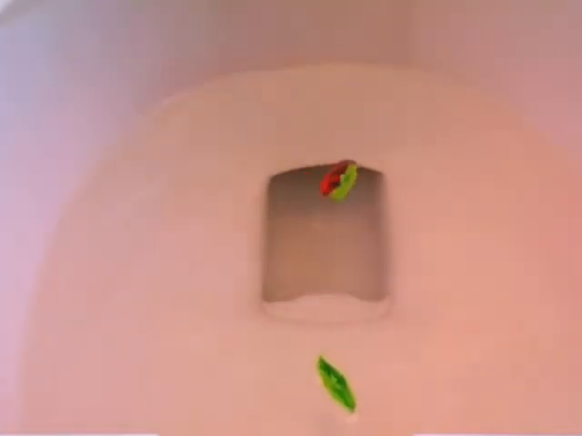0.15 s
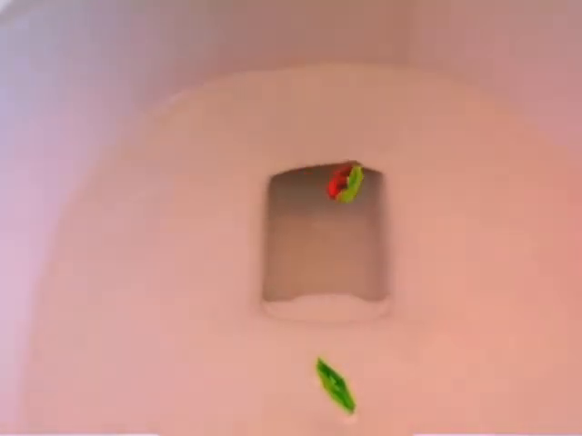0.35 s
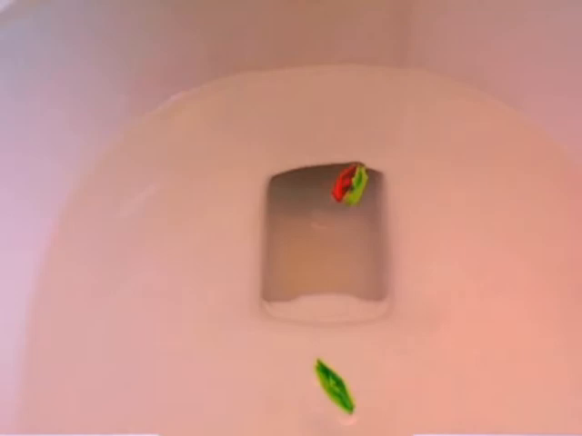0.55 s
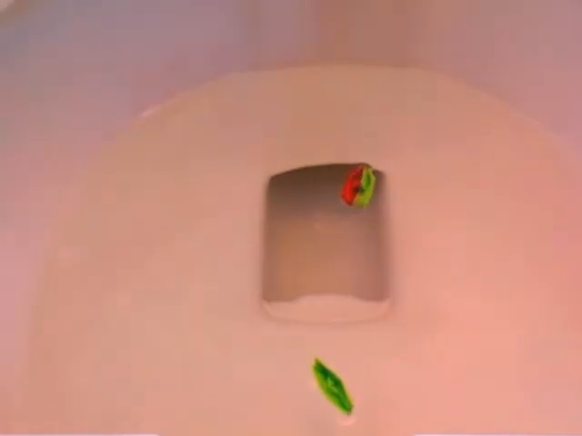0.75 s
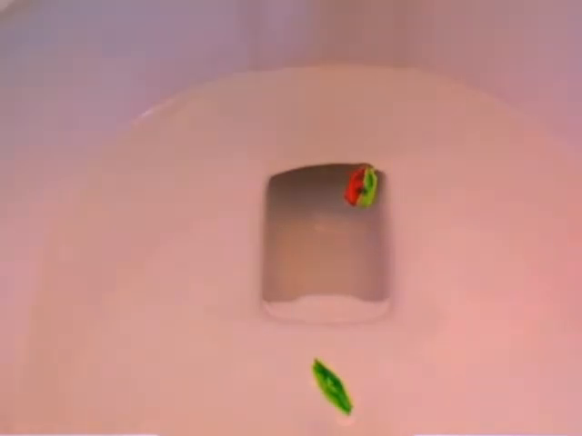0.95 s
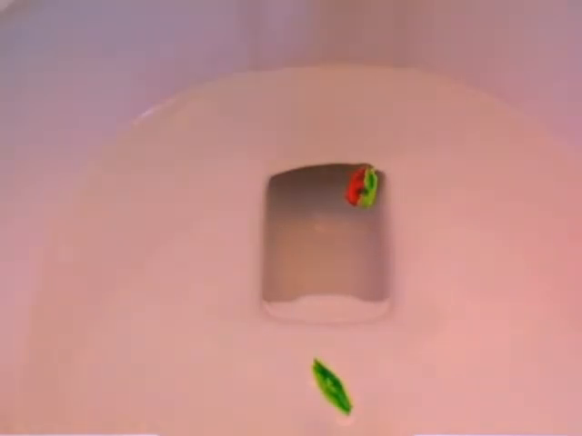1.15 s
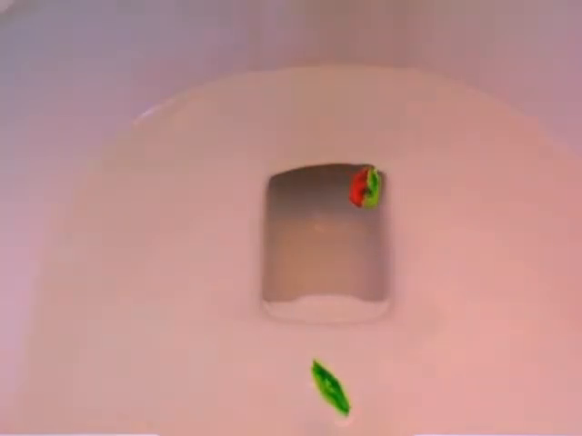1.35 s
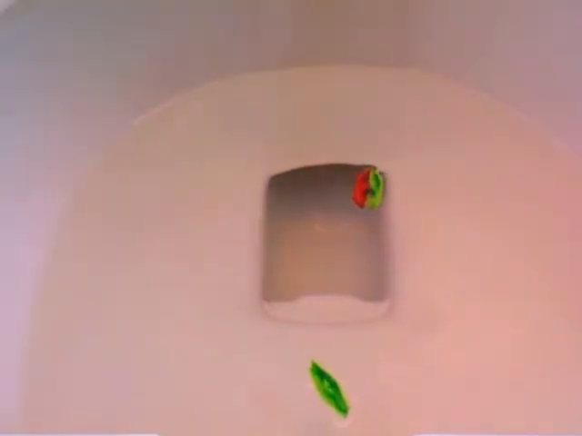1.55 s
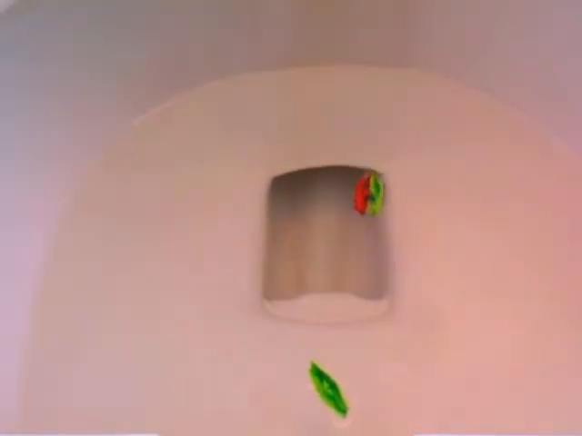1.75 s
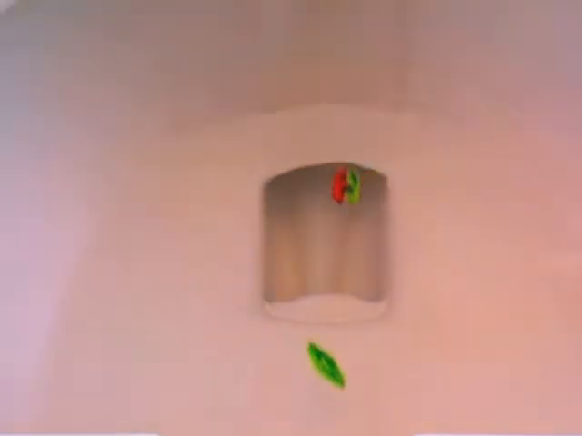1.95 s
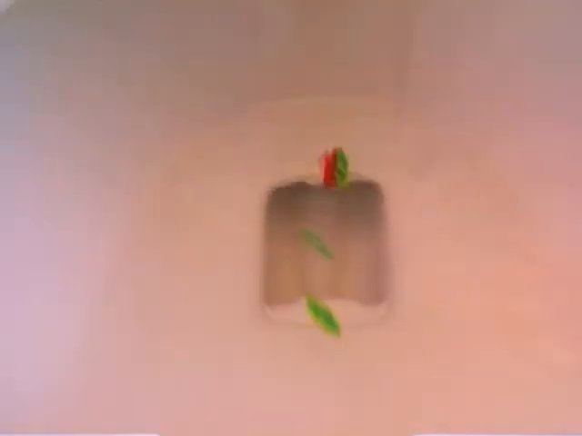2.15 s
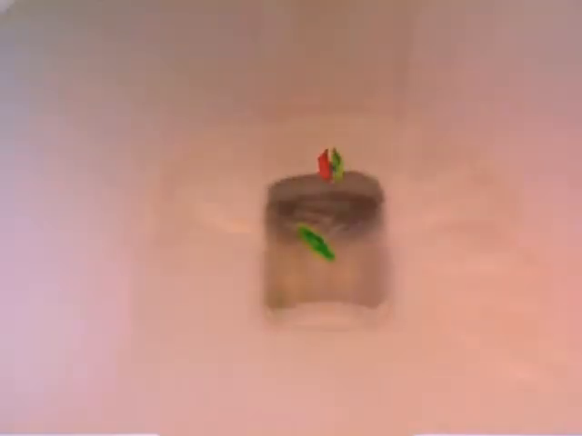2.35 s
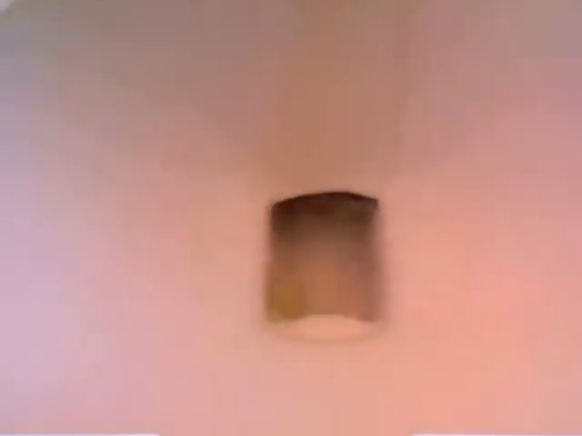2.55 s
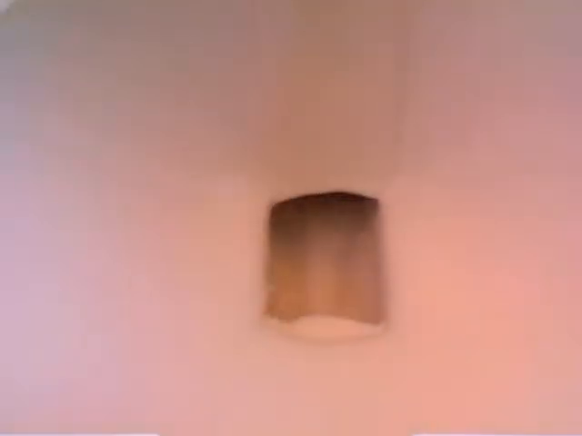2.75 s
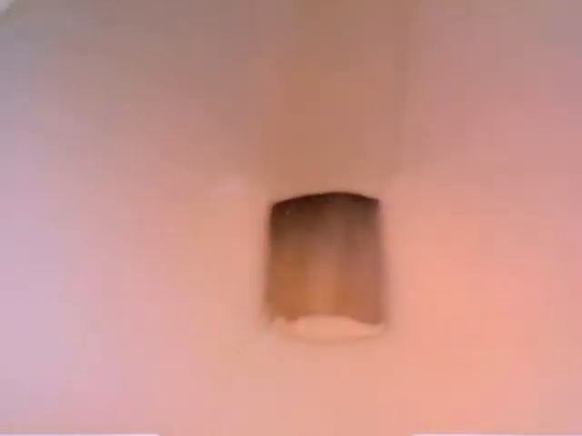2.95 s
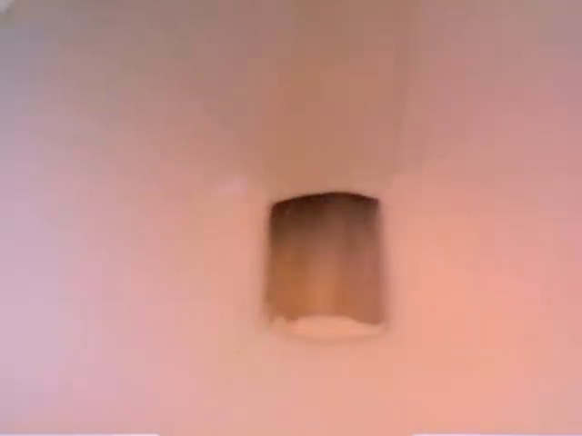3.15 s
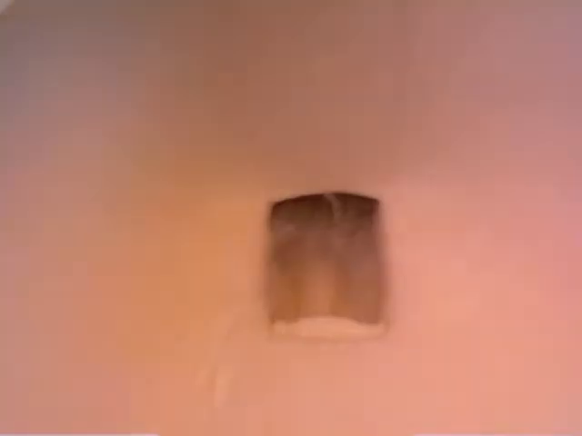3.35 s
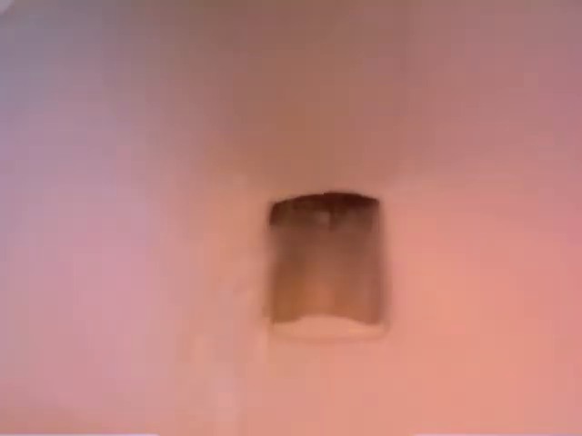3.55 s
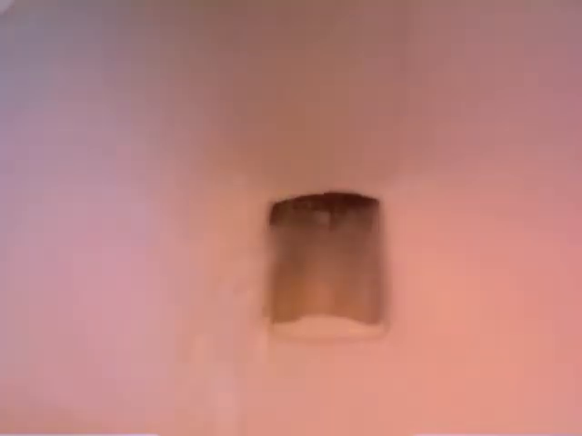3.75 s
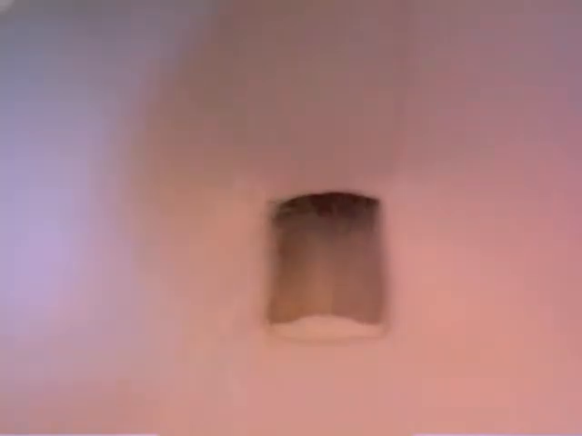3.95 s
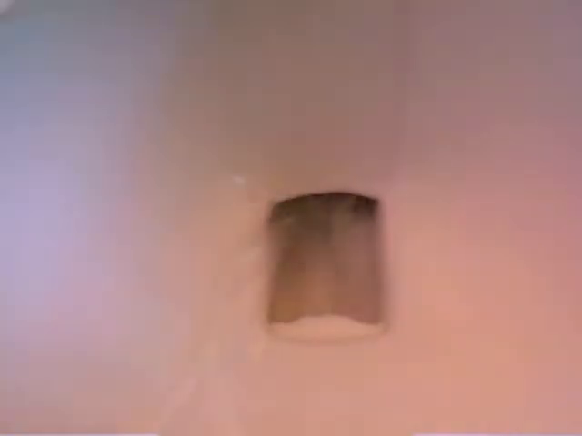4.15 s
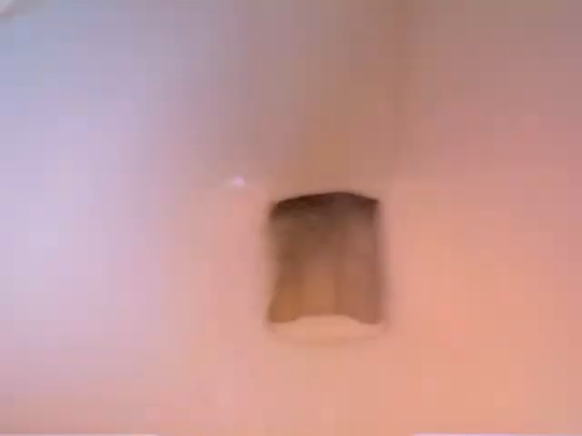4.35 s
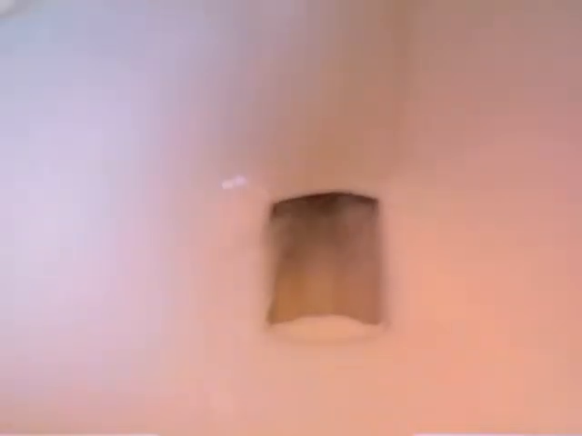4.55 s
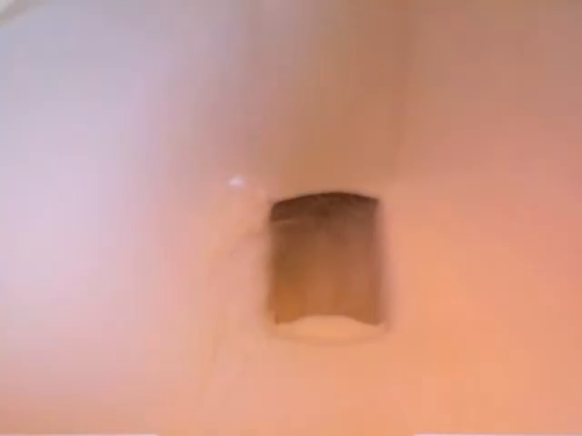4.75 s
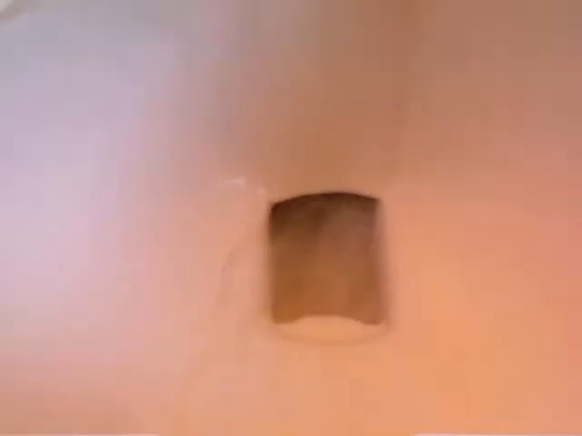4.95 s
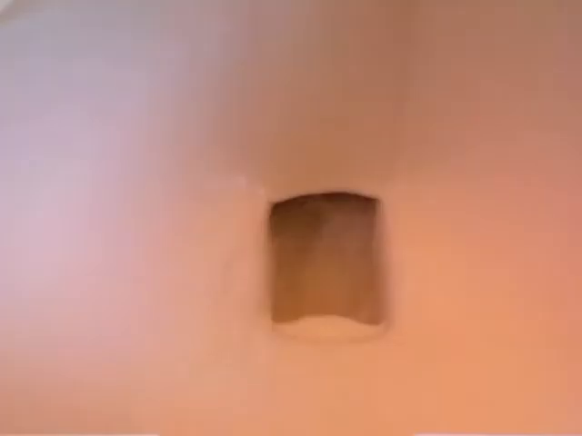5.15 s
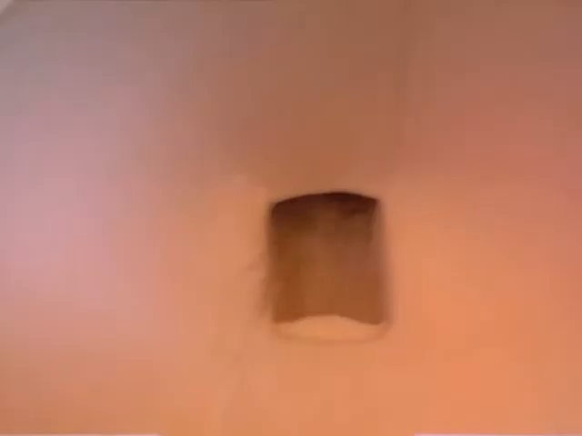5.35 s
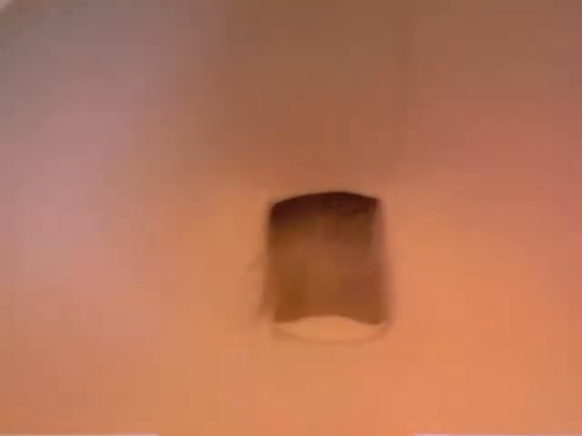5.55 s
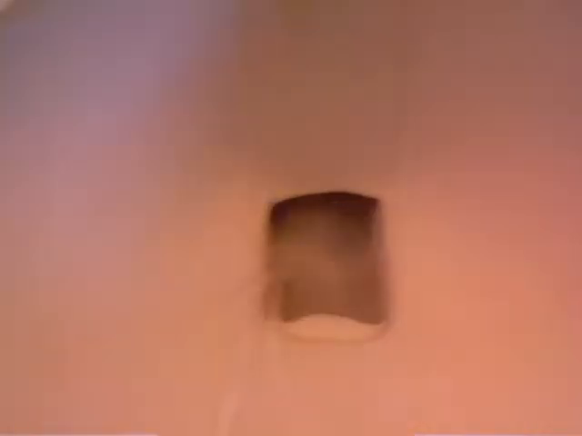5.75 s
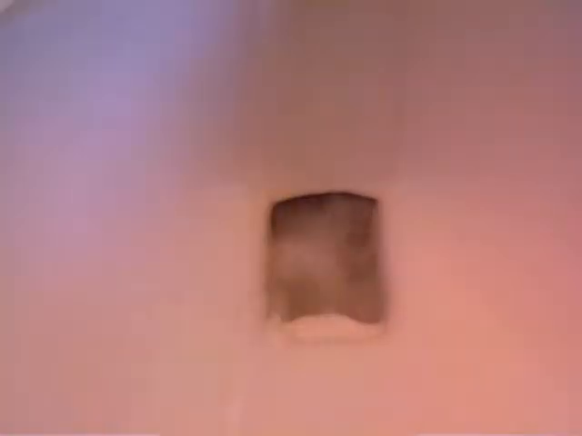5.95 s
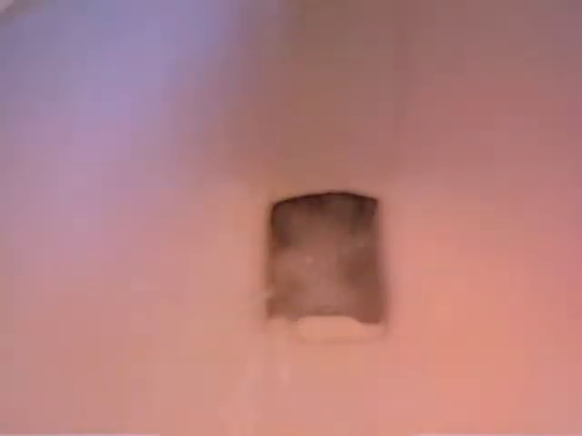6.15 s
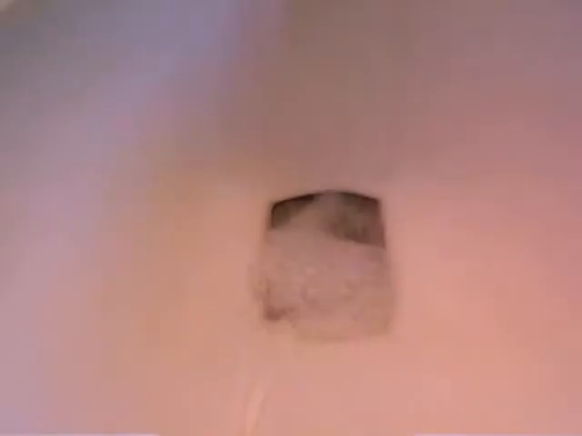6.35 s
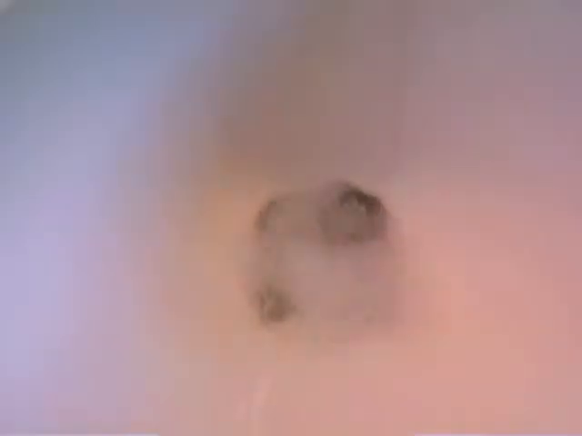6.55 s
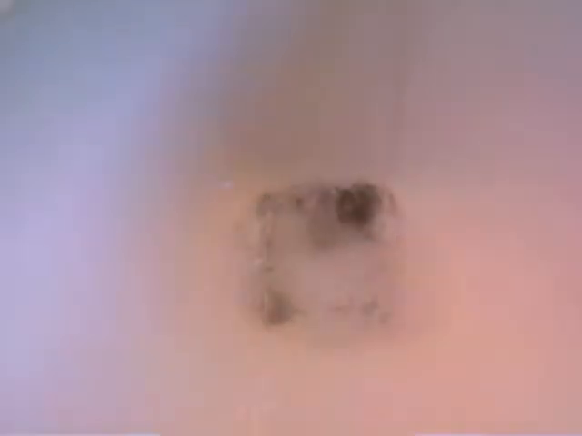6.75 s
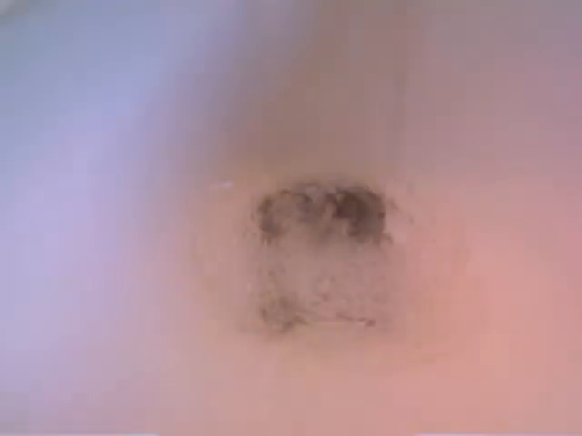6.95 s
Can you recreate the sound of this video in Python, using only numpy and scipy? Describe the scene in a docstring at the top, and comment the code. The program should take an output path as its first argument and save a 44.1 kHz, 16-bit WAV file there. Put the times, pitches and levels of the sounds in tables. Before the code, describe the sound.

In a small tiled restroom, a toilet flushes with a deep gurgle and roaring spray, fading into drips, fizz, handle creaks and singing pipes.

```python
"""A toilet flushes in a small tiled restroom, heard by one microphone just above the bowl.
Air noise and a faint hum last throughout; the inlet hisses, the lever ticks and the valve clacks open.
A jet under water gulps and booms, then breaks the surface and sprays the emptied bowl: filtered noise and drops.
The rush dies away in slaps, spits and trickles, and the last foam fizzes out in ringing bubbles.
Meanwhile the tank starts to refill, the handle creaks back in stick and slip, and the inlet begins to sing."""
import sys
import numpy as np
from scipy import signal
from scipy.fft import rfft, irfft
from scipy.io import wavfile
from scipy.ndimage import uniform_filter1d

SR = 44100
rng = np.random.default_rng(int(sys.argv[2]) if len(sys.argv) > 2 else 0)


def to_wav(s):
    """Save 16-bit WAV."""
    ch = np.atleast_2d(s).T  # columns
    pcm = np.round(np.clip(ch, -1, 1) * 32767)  # PCM
    wavfile.write(sys.argv[1], SR, pcm.astype(np.int16))


N = 308518
TIME = np.arange(N) / SR
HZ = np.fft.rfftfreq(8192, 1 / SR)


def amp(db):
    """Decibels to gain."""
    return 10 ** (np.asarray(db) / 20)


def evened(x):
    """Scales to an rms of one."""
    return x / np.sqrt(np.mean(x ** 2) + 1e-20)


def read(points, hz):
    """Reads a curve over frequency, joined on a log-frequency axis."""
    f, value = np.transpose(points)
    return np.interp(np.log(hz + 1), np.log(f + 1), value)


def level_curve(rows):
    """A level in dB at every sample; outside its span it drops by 400 dB per second."""
    s, level_db = np.transpose(rows)
    outside = np.maximum(s[0] - TIME, 0) + np.maximum(TIME - s[-1], 0)
    return np.interp(TIME, s, level_db) - 400 * outside


def add(mix, s, sound):
    """Mixes a sound in at a time."""
    part = mix[round(s * SR):][:len(sound)]
    part += sound[:len(part)]


def wander(per_s):
    """Smooth random curve with an rms of one."""
    coarse = TIME[::32]
    hz = np.fft.rfftfreq(len(coarse), coarse[1])
    spectrum = rfft(rng.standard_normal(len(coarse))) / (1 + (hz / per_s) ** 4)
    return evened(np.interp(TIME, coarse, irfft(spectrum, len(coarse))))


def swell(start, length, rise_s, fall_s):
    """Attack, hold and release, from 0 to 1."""
    t = TIME - start
    return np.clip(t / rise_s, 0, 1) * np.exp(-np.clip((t - length) / fall_s, 0, 40))


def band(x, lo_hz, hi_hz):
    """Band-pass."""
    sos = signal.butter(4, [lo_hz, min(hi_hz, SR / 2 - 1)], "band", fs=SR, output="sos")
    return signal.sosfilt(sos, x)


def colour(x, spectrum, bumps=()):
    """Causal filter of unit energy: a broad spectrum with resonances that ring after each click."""
    db = read(spectrum, HZ) + sum(d / (1 + (2 * (HZ - f) / w) ** 2) for f, w, d in bumps)
    log_gain = np.log(amp(np.maximum(db, -100)))
    # minimum phase: the Hilbert transform of the log gain gives the phase
    mirrored = np.r_[log_gain, log_gain[-2:0:-1]]
    taps = np.fft.ifft(np.exp(np.conj(signal.hilbert(mirrored)))).real[:len(HZ)]
    return signal.oaconvolve(x, taps / np.linalg.norm(taps))[:len(x)]


def resonate(x, modes):
    """Parallel resonances with steep skirts, each evened before its level is set."""
    out = 0
    for f, w, db in modes:
        sos = signal.butter(2, [f - w / 2, f + w / 2], "band", fs=SR, output="sos")
        out = out + amp(db) * evened(signal.sosfilt(sos, x))
    return out


def ring(modes, rise_s):
    """Dying modes of a struck part, with a peak of one."""
    t = TIME[:SR // 4]
    x = sum(amp(db - 60 * t / t60) * np.sin(2 * np.pi * f * t) for f, db, t60 in modes)
    x = x * (1 - np.exp(-(t / rise_s) ** 2))
    return x / abs(x).max()


def burst(decay_s):
    """A puff of noise with a sudden start, rounded to stay below one half."""
    t = TIME[:SR // 4]
    return np.tanh(rng.standard_normal(len(t))) * np.exp(-t / decay_s) / 2


def drops(per_s, spread_db):
    """Random impacts, many small and a few large."""
    own = np.random.default_rng(rng.integers(2 ** 31))
    when, sign, size = own.random((max(int(per_s * N / SR), 1), 3)).T
    height = np.sign(sign - .5) * amp(spread_db * np.minimum(-np.log(1 - size), 4))
    return evened(np.bincount((when * N).astype(int), height, N))


def bubbles(per_s, lo_hz, hi_hz, cycles, spread_db, count=28):
    """Each bubble rings for some cycles, its pitch rising as it nears the surface."""
    out = np.zeros(N)
    for hz in np.geomspace(lo_hz, hi_hz, count):
        u = TIME[:int(5 * cycles / hz * SR)] * hz / cycles
        chirp = np.exp(-u) * np.sin(2 * np.pi * cycles * u * (1 + 0.0177 * u))
        chirp = evened(chirp) / np.sqrt(len(u)) * np.sqrt(hz)
        out += signal.oaconvolve(drops(per_s / count, spread_db), chirp)[:N]
    return evened(out)


def churn(x, depth_db, span_s, span_hz):
    """Clusters of bubbles come and go, each lifting its own patch of the spectrum."""
    hz, t, z = signal.stft(x, SR, nperseg=256, noverlap=192)
    field = rng.standard_normal(z.shape)
    for axis, reach in enumerate([span_hz / hz[1], span_s / t[1]]):
        bell = np.exp(-(np.arange(-48, 49) / reach) ** 2)
        field = signal.fftconvolve(field, np.expand_dims(bell, 1 - axis), "same")
    depth = np.interp(t, TIME, depth_db * np.ones(N))
    lift = amp(depth * np.clip(evened(field), -2, 2.5))
    lift = lift / np.exp(np.log(amp(depth)) ** 2)  # keeps the mean power about even
    return signal.istft(z * lift, SR, nperseg=256, noverlap=192)[1][:N]


# Decay of the tiled room: (frequency [Hz], t60 [s])
ROOM_DECAY = [(150, 0.43), (600, 0.46), (3000, 0.59), (8000, 0.68), (15000, 0.3)]


def room(x, wet_db):
    """Adds the tiles' reflections, each band dying at its own speed; the power stays about the same."""
    taps = rng.standard_normal(SR // 2) * (rng.random(SR // 2) < 3000 / SR) * (TIME[:SR // 2] > .004)
    hz, t, z = signal.stft(taps, SR, nperseg=256)
    decay = amp(-60 * t / read(ROOM_DECAY, hz)[:, None])
    tail = signal.istft(z * decay, SR, nperseg=256)[1]
    wet = signal.oaconvolve(x, tail / np.linalg.norm(tail))[:N]
    return (x + amp(wet_db) * wet) / np.sqrt(1 + amp(wet_db) ** 2)


# Hum tones: (frequency [Hz], rms level [dB])
HUM_TONES = [(120, -68.5), (222, -72.5), (275, -66), (356, -73)]
# Spectrum of the air noise: (frequency [Hz], relative density [dB per Hz])
AIR_COLOUR = [(40, -70), (70, -15), (110, 0.5), (160, -13), (230, 2.5), (330, -3), (420, -13.5), (540, -2),
              (800, -14.5), (1300, -11), (2000, -18.5), (4000, -23.5), (8000, -37), (14000, -47)]
AIR_DB = -61.5


def ventilation():
    """Steady air noise with a faint hum that wavers in phase."""
    hum = sum(amp(db) * np.sqrt(2) * np.sin(2 * np.pi * hz * TIME + 0.48 * wander(per_s=3))
              for hz, db in HUM_TONES)
    return hum + amp(AIR_DB) * room(colour(rng.standard_normal(N), AIR_COLOUR), wet_db=-6.5)


# Inlet hiss before and into the flush: (time [s], level [dB])
SEEP_LEVEL = [(.38, -81), (.48, -60.5), (.7, -57), (1, -60.5), (1.4, -64.5), (1.7, -63)]
# Its spectrum: (frequency [Hz], relative density [dB per Hz])
SEEP_COLOUR = [(50, -45), (150, -11), (260, -8), (580, -1.5), (800, -13.5), (1300, -12.5), (2000, -15.5),
               (5000, -25), (14000, -41)]
# Inlet hiss as the tank refills: (time [s], level [dB])
REFILL_LEVEL = [(5.3, -57.5), (6.1, -50.5), (6.6, -53), (6.8, -50.5), (7, -51)]
# Its spectrum: (frequency [Hz], relative density [dB per Hz])
REFILL_COLOUR = [(90, -40), (150, -16), (220, -2), (330, -10.5), (540, 2), (900, -6.5), (1800, -6.5),
                 (2800, -7), (4000, -14.5), (5000, -14.5), (6500, -15.5), (8000, -20), (15000, -32)]
# Resonances of the supply pipe: (frequency [Hz], width [Hz], lift [dB])
PIPE_MODES = [(270, 22, 11), (530, 50, -3), (865, 39, 11.5), (1670, 45, -8), (1850, 29, 12), (6200, 250, 9),
              (6800, 160, 7), (9650, 200, 0)]
# The inlet starts to sing as its pressure builds: (time [s], level [dB])
WHISTLE_LEVEL = [(6.5, -75), (6.66, -62), (6.8, -53), (6.92, -66), (6.97, -45), (7, -49)]
# Bands of the singing: (frequency [Hz], width [Hz], relative level [dB])
WHISTLE_MODES = [(1566, 43, 5), (1880, 29, 0), (2630, 590, 3)]


def inlet():
    """Noise of the supply pipe: a hiss before the flush, then a resonant hiss and singing in the refill."""
    seep = amp(level_curve(SEEP_LEVEL)) * colour(rng.standard_normal(N), SEEP_COLOUR)
    refill = amp(level_curve(REFILL_LEVEL)) * colour(rng.standard_normal(N), REFILL_COLOUR, PIPE_MODES)
    whistle = amp(level_curve(WHISTLE_LEVEL)) * evened(resonate(rng.standard_normal(N), WHISTLE_MODES))
    return room(seep + refill + whistle, wet_db=-6.5)


# Main modes of the handle: (frequency [Hz], relative level [dB], t60 [s])
HANDLE_MODES = [(4200, 0, 0.026), (3925, 2, 0.022), (2720, -11, 0.046)]
# Creaks, the shortest mostly single slips:
# (start time [s], length [s], first level before trim and room [dB], upper mode against the main ones [dB])
CREAKS = [(6.193, .025, -47, -15), (6.251, .005, -40, -16), (6.2993, .005, -38.5, -23),
          (6.643, .013, -31.5, -32), (6.681, .035, -41.5, -18), (6.723, .042, -32, -25),
          (6.769, .04, -32.5, -29), (6.821, .043, -34, -26), (6.8704, .005, -33, -12),
          (6.8798, .005, -30, -4.5), (6.966, .005, -37, -5)]
SLIP_GAP_S, SLIP_JITTER = 0.0069, .15  # jitter: spread of the gap's natural log
SLIP_SPREAD_DB, SLIP_SAG_DB_PER_S = 1.5, 74


def handle():
    """The handle sticks and slips in uneven runs that weaken; each slip rings it briefly."""
    out = np.zeros(N)
    main, upper = ring(HANDLE_MODES, rise_s=0.0019), ring([(5110, 0, 0.027)], rise_s=0.00066)
    for s, length, db, upper_db in CREAKS:
        t = 0
        for late, size in rng.standard_normal((12, 2)):
            if t < length:
                slip_db = db - SLIP_SAG_DB_PER_S * t + SLIP_SPREAD_DB * size
                add(out, s + t, amp(slip_db) * (main + amp(upper_db) * upper))
            t += SLIP_GAP_S * np.exp(SLIP_JITTER * late)
    return amp(1.0) * room(out, wet_db=-11.5)


# The lever ticks as it takes up its slack: (time [s], peak before the room [dB], pitch [Hz], t60 [s])
LEVER_TICKS = [(1.425, -56, 5440, .04), (1.426, -40.5, 3380, 0.096), (1.445, -39, 1120, 0.11)]
# The valve snaps open: (time [s], gain [dB])
CLACK = (1.4645, -8.5)
# Ringing modes of the tank: (frequency [Hz], relative level [dB], t60 [s])
CLACK_MODES = [(242, 7, 0.12), (575, -14, 0.21), (833, -3, 0.071), (1210, -6, 0.13), (2650, -2, 0.14),
               (2630, -7, 0.11), (3585, -15, 0.13), (4070, -17, 0.16), (5006, -10, 0.098), (6939, -23, .13)]
# Spectrum of the snap: (frequency [Hz], relative density [dB per Hz])
CLACK_COLOUR = [(59, -48), (100, -22), (222, -6), (443, -12), (1210, -8), (2090, -15), (2580, -5),
                (3760, -25), (4180, -12.5), (6760, -17), (15000, -41)]


def valve():
    """The lever ticks, then the valve snaps open and rings the tank."""
    out = np.zeros(N)
    for s, db, hz, t60 in LEVER_TICKS:
        add(out, s, amp(db) * ring([(hz, 0, t60)], rise_s=0.0017))
    snap = colour(burst(decay_s=0.015), CLACK_COLOUR)
    tank = amp(-7.5) * ring(CLACK_MODES, rise_s=0.018)
    add(out, CLACK[0], amp(CLACK[1]) * (snap + tank))
    return room(out, wet_db=-7.5)


# The rim trickles into the trap as the rush fades: (time [s], level [dB])
TRICKLE_LEVEL = [(4.9, -50), (5.2, -43.5), (5.5, -41.5), (5.75, -45), (6.0, -40), (6.15, -49), (6.35, -83),
                 (6.6, -64)]
# Its resonances: (frequency [Hz], width [Hz], relative level [dB])
TRICKLE_MODES = [(573, 110, -8), (1140, 450, -7), (1794, 120, 1.5), (2310, 99, -0.5), (2580, 530, 2.5),
                 (2805, 170, -1.5)]
# The last air fizzes out: (time [s], level [dB])
FIZZ_LEVEL = [(5.83, -72), (5.88, -54), (5.92, -49.5), (6.02, -44), (6.06, -64), (6.11, -79)]
# Its resonances: (frequency [Hz], width [Hz], relative level [dB])
FIZZ_MODES = [(5450, 500, -6), (6500, 500, -0.5), (7800, 1000, -3.5), (9150, 700, -2), (11600, 1100, -9)]


def last_water():
    """The rim trickles into the refilling trap, and a patch of foam bursts in tiny pings."""
    trickle = resonate(drops(per_s=1000, spread_db=2), TRICKLE_MODES)
    pings = bubbles(per_s=900, lo_hz=5200, hi_hz=12000, cycles=24, spread_db=2, count=20)
    foam = resonate(pings, FIZZ_MODES)
    trickle = evened(churn(trickle, depth_db=4.5, span_s=.011, span_hz=250))
    foam = evened(churn(foam, depth_db=5, span_s=.006, span_hz=300))
    return room(amp(level_curve(TRICKLE_LEVEL)) * trickle + amp(level_curve(FIZZ_LEVEL)) * foam, wet_db=-13.0)


# Strength of the spray in the bowl, steering rush, trapway and spatter: (time [s], level [dB])
FLOW_LEVEL = [(2.25, -39.5), (2.48, -31.5), (2.6, -25), (2.63, -18.5), (2.97, -18.5), (3.55, -18.5),
              (3.8, -23), (4.08, -26.5), (4.52, -29.5), (4.72, -37), (5.1, -39.5), (5.66, -44), (5.8, -54),
              (6.0, -46), (6.5, -66)]
FULL_DB = -19.5  # the flow level that counts as full
SPATTER_S = (3.9, 5.7)  # the thinning spray throws light slaps and small spits between these times


def spatter(per_s, over_db, spread_db):
    """Chance events in the thinning spray, following the flow: rows (time [s], level [dB], chance 0-1)."""
    start, end = SPATTER_S
    count = max(int(per_s * (end - start)), 1)
    own = np.random.default_rng(rng.integers(2 ** 31))
    when, size, chance = own.random((count, 3)).T
    s = start + when * (end - start)
    flow_db = np.interp(s, *np.transpose(FLOW_LEVEL))
    return zip(s, flow_db + over_db + spread_db * np.sqrt(12) * (size - .5), chance)


# Single spits, late drips and foam pings, and at 2.53 s and 2.565 s the brighter body of gulps: (time [s], peak
# before the room [dB], pitch [Hz])
SINGLE_SPITS = [(2.365, -25, 4360), (2.53, -17, 1250), (2.565, -11, 990), (4.143, -28, 526),
                (4.173, -24.5, 507), (4.239, -21, 3870), (4.345, -20.5, 6930), (4.42, -28.5, 512),
                (4.59, -20.5, 4000), (4.733, -30, 9500), (4.8, -19, 2580), (4.886, -29, 4150),
                (4.985, -27, 5450), (5.325, -37, 11000), (5.853, -47, 11700), (5.901, -38, 9000),
                (5.919, -39, 6640), (6.016, -38, 7760), (6.083, -50, 11900), (6.363, -49, 4400),
                (6.48, -48, 5500), (6.555, -46, 5840)]
SMALL_SPITS_PER_S, SMALL_SPIT_DB, SMALL_SPIT_SPREAD_DB = 40, 2.5, 3  # dB against the flow, before tilt
SMALL_SPIT_HZ, SMALL_SPIT_TILT_DB = (2770, 11900), -7.5  # their range; the highest against the lowest


def spits():
    """Each spit is a knot of bubbles of nearly one size: a short puff of narrow-band noise."""
    out, t = np.zeros(N), TIME[:SR // 10]
    lo, hi = SMALL_SPIT_HZ
    small = [(s, db + SMALL_SPIT_TILT_DB * chance, lo * (hi / lo) ** chance)
             for s, db, chance in spatter(SMALL_SPITS_PER_S, SMALL_SPIT_DB, SMALL_SPIT_SPREAD_DB)]
    for s, db, hz in list(SINGLE_SPITS) + small:
        # the second half, once the resonance has built up
        knot = resonate(rng.standard_normal(len(t) * 2), [(hz, 5 * np.sqrt(hz), 0)])[len(t):]
        knot *= (1 - np.exp(-t / 0.0015)) * np.exp(-t / 0.017)
        add(out, s, amp(db) * knot / abs(knot).max())
    return room(out, wet_db=-12)


# Single slaps of water on the porcelain, the heaviest in the full rush:
# (time [s], peak before trim and room [dB], gain of the body against the treble [dB])
SINGLE_SLAPS = [(2.558, -3.5, 18), (2.588, -9, 22), (2.611, -6, 10), (2.617, -5.5, 3), (2.631, 0, 3),
                (2.644, -4, 4), (2.711, -3.5, 18), (2.882, -0.5, 3), (3.173, -1, -14), (3.206, -5.5, -2),
                (3.305, -4.5, -6), (3.383, -10.5, 15), (3.405, -5.5, -9), (3.438, 0, -14), (3.704, -17, -7),
                (3.769, -7, -9), (3.837, -4, 1), (3.917, -2, 0.5), (4.031, -13, -23), (4.165, -13, -14),
                (4.451, -11.5, -10), (4.522, -15, -4), (4.908, -21, -7), (5.398, -24, -6),
                (5.698, -26.5, -3)]
# The jet breaks the surface and pushes a puff of air at the microphone:
# (time [s], peak before trim and room [dB])
PUFF = (2.608, -42)
SMALL_SLAPS_PER_S, SMALL_SLAP_BODY_DB = 9.4, -8
SMALL_SLAP_DB, SMALL_SLAP_SPREAD_DB = 7, 2.5  # peak against the flow, before trim and room


def slaps():
    """Slugs of water hit the bowl as noise bursts, duller than the spray; a low puff meets the microphone."""
    out = np.zeros(N)
    light = spatter(SMALL_SLAPS_PER_S, SMALL_SLAP_DB, SMALL_SLAP_SPREAD_DB)
    rows = list(SINGLE_SLAPS) + [(s, db, SMALL_SLAP_BODY_DB) for s, db, _ in light]
    hits = np.concatenate([burst(decay_s=.005) for _ in rows])
    hits = colour(hits, RUSH_COLOUR, BOWL_MODES)
    bodies = band(hits, 255, 1470)
    tops = band(hits, 1120, 5720) + amp(-7.0) * band(hits, 8700, 11800)
    for (s, db, body_db), body, top in zip(rows, np.split(bodies, len(rows)), np.split(tops, len(rows))):
        slap = amp(body_db) * body + top
        add(out, s, amp(db) * slap / abs(slap).max())
    add(out, PUFF[0], amp(PUFF[1]) * ring([(38, 0, .09)], rise_s=.004))
    return amp(-1) * room(out, wet_db=-8)


# Resonances of the trapway: (frequency [Hz], width [Hz], relative level [dB])
TRAP_MODES = [(266, 33, 0.5), (223.2, 27.7, -5), (169, 43, -20.5), (355.6, 14.5, -15.5)]
# The trapway swallows air and booms: (start time [s], length [s], starting level [dB])
BOOMS = [(1.616, 0.42, -17.5), (2.107, 0.056, -25.5), (2.264, .2, -21.5), (2.54, 0.14, -29.5),
         (2.696, .42, -20), (3.245, 0.21, -37.5), (3.75, .19, -39), (4.523, 0.038, -34), (4.761, 0.05, -37),
         (4.939, 0.16, -45.5), (6.186, .08, -55)]
BOOM_RISE_S, BOOM_FALL_S, BOOM_SAG_DB_PER_S = 0.022, 0.04, 18
MURMUR_DB, MURMUR_SLOPE = -45, 0.48  # rumble between booms at full flow; dB it loses for each dB of flow
# Large pockets of air gulp through the jet:
# (time [s], peak before the room [dB], nominal pitch [Hz], length [s])
GULPS = [(1.635, -6.5, 240.7, 0.0336), (1.687, -17, 232, 0.016), (1.725, -4.5, 268, 0.034),
         (1.803, -9, 277, 0.046), (1.853, -13.5, 274, 0.032), (2.55, -12, 528, 0.027),
         (2.585, -11, 557, 0.0138), (2.606, -9.5, 560, 0.022), (4.534, -31, 276.6, 0.048)]


def trapway():
    """Trapped air rumbles and booms as it is swallowed; large pockets ring in swells that sag in pitch."""
    boom = resonate(rng.standard_normal(N), TRAP_MODES)
    boom = evened(boom / np.sqrt(uniform_filter1d(boom ** 2, size=3000) + 1e-6))  # steadies the noise
    murmur_db = MURMUR_DB + MURMUR_SLOPE * (level_curve(FLOW_LEVEL) - FULL_DB)
    power = amp(murmur_db + 2 * wander(per_s=7.7)) ** 2
    for s, length, db in BOOMS:
        sagging_db = db - BOOM_SAG_DB_PER_S * np.clip(TIME - s, 0, length)
        power += (amp(sagging_db) * swell(s, length, BOOM_RISE_S, BOOM_FALL_S)) ** 2
    out = boom * np.sqrt(power)
    for s, db, hz, length in GULPS:
        t = TIME[:int(length * SR)]
        tone = np.sin(2 * np.pi * hz * t * (1.04 - 0.052 * t / length))
        add(out, s, amp(db) * signal.windows.tukey(len(t), .55) * tone)
    return room(out, wet_db=-14.5)


# The jet under water: (time [s], level before stir, spit and flutter [dB])
JET_LEVEL = [(1.606, -51), (1.619, -27.5), (1.67, -27.5), (1.9, -28), (2.2, -31), (2.32, -27.5),
             (2.58, -25)]
# Its spectrum: (frequency [Hz], relative density [dB per Hz])
JET_COLOUR = [(210, -19), (350, 3), (630, 3.5), (770, -8), (930, 1.5), (1080, -9.5), (1400, -9.5),
              (1900, -11.5), (2250, -8.5), (3500, -12.5), (4400, -16), (5600, -23.5), (12400, -31.5),
              (15000, -38)]
# The flooded trap colours the jet: (frequency [Hz], width [Hz], lift [dB])
FLOODED_MODES = [(920, 110, 1.5), (1254, 125, 9), (1426, 47, 7), (2170, 37, 6), (3300, 140, 3.5),
                 (4210, 120, 10), (4730, 72, 6), (5080, 150, 7.5), (5700, 170, 4.5), (7900, 73, 7)]
# The jet first spits out the air in the pipe: (start time [s], length [s], level before flutter [dB])
AIR_SPIT = (1.618, 0.038, -25.5)
AIR_SPIT_RISE_S, AIR_SPIT_FALL_S, AIR_SPIT_BODY_DB = 0.035, 0.042, 1.5  # body: gain against the treble
JET_TREBLE_DB, GULP_STIR = -40.5, 2  # ceiling of its treble without spit; how much a gulp swells the jet


def jet():
    """Water forced in under the surface: a muffled hiss, bright while it spits air, and a rumble in the pipe."""
    level = amp(level_curve(JET_LEVEL))
    stir = 1 + GULP_STIR * sum(amp(db) ** 2 * swell(s, length, rise_s=0.0051, fall_s=0.0056)
                               for s, db, _, length in GULPS)
    spit_s, spit_length, spit_db = AIR_SPIT
    spit = amp(spit_db) * swell(spit_s, spit_length, AIR_SPIT_RISE_S, AIR_SPIT_FALL_S)
    water = rng.standard_normal(N) + 0.46 * drops(per_s=1200, spread_db=3.0)
    hiss = room(colour(water, JET_COLOUR, FLOODED_MODES), wet_db=-5.5)
    rumble = amp(-13.0) * evened(band(rng.standard_normal(N), 94, 195))
    rumble = rumble * np.interp(TIME, [1.85, 2.2], [1, .25])
    body = evened(band(hiss, 263, 5660)) + rumble
    sound = body * np.hypot(level * stir, amp(AIR_SPIT_BODY_DB) * spit)
    treble = evened(band(hiss, 6100, 15000))
    sound += treble * np.hypot(np.minimum(level, amp(JET_TREBLE_DB)), spit)
    return sound * amp(-.5 + 0.88 * wander(per_s=45))


# Gushes of spray: (start time [s], length [s], lift of the middle [dB], lift of the mist [dB])
GUSHES = [(2.29, 0.028, -4, 13), (2.355, .04, 6, 8), (2.475, 0.032, 7, 6), (2.606, 0.021, 2.5, 9),
          (2.762, 0.064, 3.5, 0), (2.854, .035, 3, -1.5), (3.067, .035, 4, -1), (3.15, 0.079, 3.5, 0),
          (3.4, 0.064, 4, 0.5), (3.584, 0.022, 3, 0.5), (3.832, 0.06, 6, 1.5), (3.902, 0.019, 9, -3),
          (3.992, 0.027, 1, 2.5), (4.212, 0.053, 2.5, 4), (4.414, 0.035, 5.5, -1.5), (4.497, .025, 3, 0),
          (4.785, .03, 4, -5), (4.878, 0.029, 11.5, 1.5), (5.085, 0.073, 8, 0.5)]
GUSH_RISE_S, GUSH_FALL_S, GUSH_BODY = 0.0093, 0.017, 0.28  # the last: share of the middle's lift for the body
BREAK_S = 2.61  # the jet breaks the surface
BODY_DB, BODY_SLOPE = -7, 0.79  # body against full flow; dB it loses for each dB of flow
PLUNGE_DB, PLUNGE_BEFORE_S, PLUNGE_AFTER_S = 10.5, 0.11, 0.5  # extra body as the jet plunges in the last water
# mist against the flow; its loss under water; its gain from loose drops
MIST_DB, MIST_COVERED_DB, MIST_LOOSE_DB = -6, -3, 3


def spray_levels(loose):
    """Levels in dB of the spray's body, middle and mist: all follow the flow and its gushes."""
    flow_db, since = level_curve(FLOW_LEVEL), TIME - BREAK_S
    gush_db, gush_mist_db = sum(np.outer(lifts, swell(s, length, GUSH_RISE_S, GUSH_FALL_S))
                                for s, length, *lifts in GUSHES)
    plunge = np.exp(-abs(since) / np.where(since < 0, PLUNGE_BEFORE_S, PLUNGE_AFTER_S))
    body_db = FULL_DB + BODY_DB + BODY_SLOPE * (flow_db - FULL_DB)
    body_db = body_db + PLUNGE_DB * plunge + GUSH_BODY * gush_db
    mist_db = flow_db + MIST_DB + MIST_COVERED_DB * (since < 0) + MIST_LOOSE_DB * loose + gush_mist_db
    return body_db, flow_db + gush_db, mist_db


# Share of separate drops and bubbles in the spray: high at first, lower in the full rush,
# highest as it thins, then none: (time [s], share [0-1])
LOOSE_SHARE = [(2.3, 0.62), (2.7, 0.29), (3.8, 0.43), (4.1, 0.74), (4.6, 0.6), (5.1, 0.55), (5.6, 0.4),
               (6.3, 0)]
# Spectrum of the spray: (frequency [Hz], relative density [dB per Hz])
RUSH_COLOUR = [(150, -35), (330, -8), (450, -8.5), (700, -5.5), (1100, -7), (1900, -7.5), (2900, 1),
               (4200, -1.75), (6000, -18), (8500, -11.5), (11000, -20), (13500, -25.5), (15000, -27.5)]
# Air resonances of the bowl and the dips between them: (frequency [Hz], width [Hz], lift [dB])
BOWL_MODES = [(404, 160, -5.5), (547.4, 59, 10), (612, 84, -7), (790, 163, -10), (1264, 160, 8.5),
              (1390, 444, -10.5), (1507, 37, 6), (1772, 250, 5), (2056, 192, -10), (2296, 58, 3.5),
              (2380, 110, -3.5), (2547, 32, -8.5), (2630, 45, -2), (3340, 400, -5), (3632, 400, -9.0),
              (4540, 40, 5), (4590, 650, -10), (5220, 200, 3), (5620, 190, 5), (6620, 320, 6),
              (7100, 93, -1.5), (7850, 52, -10), (8060, 98, 6), (8520, 620, -7), (9800, 66, -21),
              (13570, 333, 5)]
# the finest mist: above this pitch; its gain at full flow; extra dB lost for each dB of flow
FINE_HZ, FINE_DB, FINE_SLOPE = 9300, 1.5, 0.19


def rush():
    """An even sheet of spray and clusters of loose drops and bubbles excite the bowl in changing shares."""
    loose = np.interp(TIME, *np.transpose(LOOSE_SHARE))
    body_db, middle_db, mist_db = spray_levels(loose)
    sheet = evened(rng.standard_normal(N) + amp(-2.5) * drops(per_s=1200, spread_db=3.5))
    beads = bubbles(per_s=1300, lo_hz=445.4, hi_hz=12406, cycles=17.6, spread_db=2.0)
    beads = evened(beads + drops(per_s=700, spread_db=2.0))
    spray = np.sqrt(1 - loose) * sheet + np.sqrt(loose) * beads
    spray = spray * amp(1.07 * wander(per_s=60))
    spray = churn(spray, depth_db=1.3 + 6 * loose ** 2, span_s=.008, span_hz=240)
    water = room(colour(spray, RUSH_COLOUR, BOWL_MODES), wet_db=-6.5)
    body = amp(body_db + wander(per_s=6.7)) * evened(band(water, 335, 1710))
    middle = amp(middle_db + .5 * wander(per_s=9.9)) * evened(band(water, 1500, 5480))
    mist = evened(band(water, 5070, 15000))
    fine = signal.sosfiltfilt(signal.butter(4, FINE_HZ, "high", fs=SR, output="sos"), mist)
    fine_db = FINE_DB + FINE_SLOPE * (level_curve(FLOW_LEVEL) - FULL_DB)
    mist = amp(mist_db) * (mist - fine + amp(fine_db) * fine)
    return amp(-2.02) * (body + middle + mist)


def scene():
    """All sources at one microphone."""
    surroundings = ventilation() + inlet() + handle() + valve()
    water = last_water() + spits() + slaps() + trapway() + jet() + rush()
    return (surroundings + water)[None]


EDGE_HZ = 15400  # upper band limit


def record(dry):
    """The loudest peaks are rounded off; then the bass cut and the band limit."""
    rounded = dry / (1 + (dry / .93) ** 8) ** (1 / 8)
    rounded = signal.sosfilt(signal.butter(2, 40, "high", fs=SR, output="sos"), rounded)
    low_pass = signal.firwin(511, EDGE_HZ, window=("kaiser", 9), fs=SR)
    return signal.oaconvolve(rounded, low_pass[None], "same")


dry = scene()
out = record(dry)
to_wav(out)
```